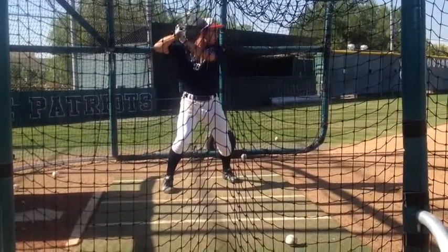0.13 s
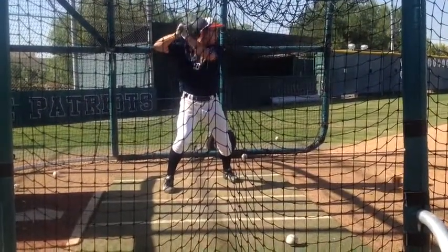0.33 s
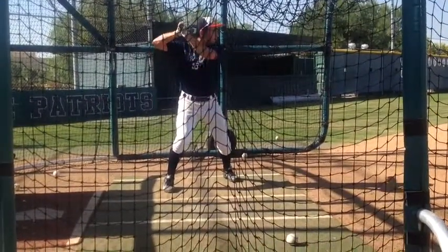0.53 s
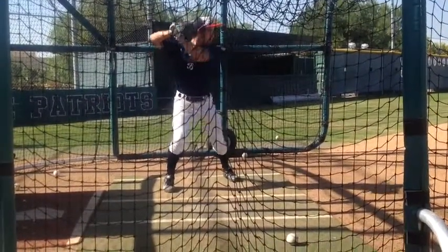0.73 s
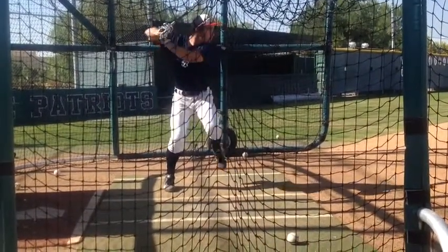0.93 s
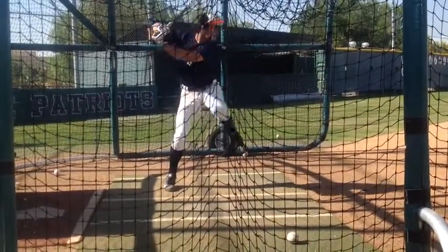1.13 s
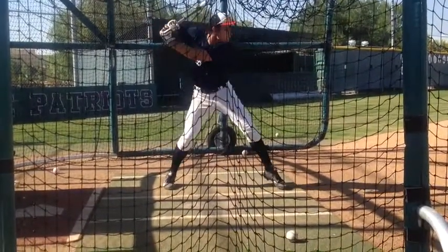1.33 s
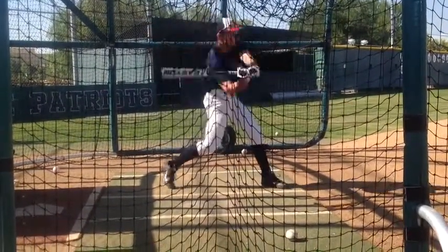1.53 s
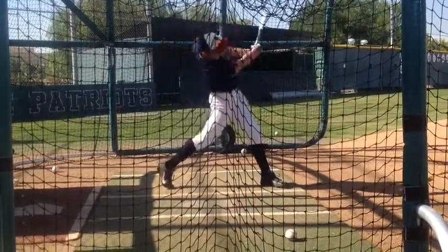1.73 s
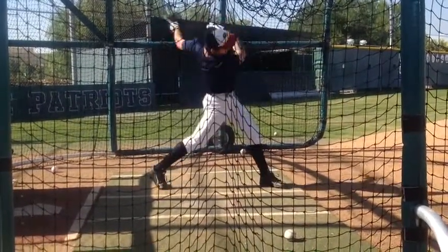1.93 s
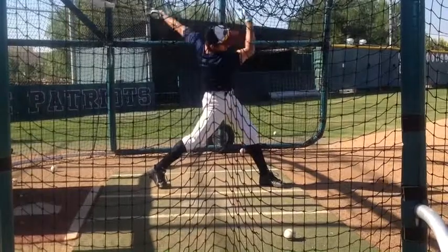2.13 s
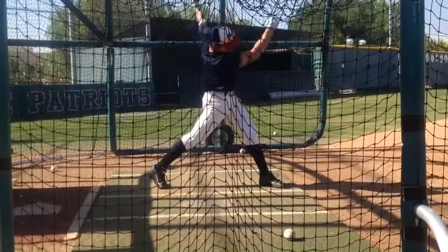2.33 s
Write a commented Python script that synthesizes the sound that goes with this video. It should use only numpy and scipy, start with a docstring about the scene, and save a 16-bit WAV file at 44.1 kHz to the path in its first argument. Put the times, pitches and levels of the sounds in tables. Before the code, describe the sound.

A bat hits a baseball with one sharp crack and brief ring over faint hum.

```python
"""A bat meets a pitched baseball in an outdoor batting cage: one hard crack, a hollow knock and a
brief ring of the barrel, loud enough to overload the input. Nearby walls slap the crack back and the
ballpark adds a short tail. The ball lands with a dull thud and shoes scuff the mat.
A motor, probably the pitching machine, hums under faint open-air noise."""
import sys
import numpy as np
from scipy import signal
from scipy.fft import rfft, irfft
from scipy.io import wavfile

SR = 44100
rng = np.random.default_rng(int(sys.argv[2]) if len(sys.argv) > 2 else 0)


def dump(signal):
    """Clip the signal to [-1, 1] and save it as 16-bit WAV at the path in sys.argv[1]."""
    limited = np.clip(np.atleast_2d(signal).T, -1, 1)
    pcm = np.round(limited * 32767).astype(np.int16)
    wavfile.write(sys.argv[1], SR, pcm)


N = 104958
HIT_S = 1.6488
# colour of grit under ball and shoes: f/Hz, relative level/dB
GRIT = [(50, -50), (200, -20), (1200, -9), (2400, -1.5), (3800, -14), (6000, -36), (15000, -35)]


def amp(db):
    """Decibels to gain."""
    return 10 ** (np.asarray(db) / 20)


def curve(points, hz, column=1):
    """A column of a spectrum table, interpolated over log frequency."""
    table = np.array(points, float)
    return np.interp(np.log(hz + 1), np.log(table[:, 0] + 1), table[:, column])


def add(mix, start_s, sound):
    """Lays a sound into the mix."""
    part = mix[round(start_s * SR):][:len(sound)]
    part += sound[:len(part)]


def pulse(colour, size=4096):
    """The sharpest causal click with a given spectrum (minimum phase)."""
    hz = abs(np.fft.fftfreq(size, 1 / SR))
    log_gain = np.log(amp(curve(colour, hz)))
    spectrum = np.exp(np.conj(signal.hilbert(log_gain)))
    return np.fft.ifft(spectrum).real[:size // 2]


def dull(x, cutoff_hz):
    """Rolls off the treble."""
    return signal.lfilter(*signal.butter(2, cutoff_hz, fs=SR), x)


def ring(modes):
    """Struck modes as decaying sines, one second long."""
    t = np.arange(SR) / SR
    return sum(amp(db - 60 * t / t60) * np.sin(2 * np.pi * hz * t) for hz, db, t60 in modes)


def attack(rise_s):
    """A one-second envelope that softens an onset."""
    return 1 - np.exp(-np.arange(SR) / SR / rise_s)


def burst(colour, t60):
    """A dying puff of coloured noise."""
    t = np.arange(SR // 2) / SR
    puff = rng.standard_normal(len(t)) * amp(-60 * t / t60)
    return signal.fftconvolve(puff / np.linalg.norm(puff), pulse(colour))


def drift(rate_hz):
    """A slow random wobble of unit RMS."""
    hz = np.fft.rfftfreq(N, 1 / SR)
    wobble = irfft(rfft(rng.standard_normal(N)) * np.exp(-(hz / rate_hz) ** 2) * (hz > 0), N)
    return wobble / wobble.std()


def reverb(bands, far_db=-100, far_t60=1):
    """Dense reflections, each band dying at its own speed, over a fainter long decay."""
    hz, t, noise = signal.stft(rng.choice([-1., 1.], SR), SR, nperseg=256)
    t60 = curve(bands, hz, column=2)[:, None]
    fade = amp(-60 * t / t60) + amp(far_db - 60 * t / far_t60)
    wash = signal.istft(noise * fade, SR, nperseg=256)[1][:SR]
    return signal.fftconvolve(wash / np.linalg.norm(wash), pulse(bands))[:SR]


def open_air():
    """A bed of distant outdoor noise that swells slightly."""
    # colour of the air: f/Hz, relative level/dB
    colour = [(18, -88), (30, -65), (75, -26.5), (92, -15), (114, -21.5), (130, -16), (177, -7), (208, -8),
              (237, -8.5), (307, -11.5), (410, -19), (591, -15), (1170, -20), (1290, -19), (1820, -23),
              (2240, -26), (15500, -46)]
    # its slow rise and fall: t/s, level/dB
    levels = [(0, -50), (.3, -49), (.6, -50), (.8, -50), (.95, -49), (1.2, -50.5), (1.6, -48), (2.0, -49),
              (2.38, -50)]
    hz = np.fft.rfftfreq(N, 1 / SR)
    bed = irfft(rfft(rng.standard_normal(N)) * amp(curve(colour, hz)), N)
    level_db = np.interp(np.arange(N) / SR, *np.transpose(levels)) + 0.4 * drift(13)
    return bed / bed.std() * amp(level_db)


def motor():
    """A wavering hum, mostly second harmonic, with thin whines on top."""
    # swells and dips of the second harmonic: t/s, RMS level/dB
    levels = [(0, -50.5), (.15, -48.5), (.45, -50.5), (.63, -51.5), (.78, -67), (.92, -68), (1.05, -58),
              (1.13, -49.5), (1.42, -46), (1.55, -50), (1.82, -50), (2.0, -57.5), (2.15, -56),
              (2.38, -49.5)]
    # motor whines: f/Hz, RMS level/dB
    whines = [(937, -72.5), (1147, -67), (1459, -72.5), (1669, -69.5), (1873, -67.5), (2390, -72.5)]
    hum_hz, fundamental_db, flutter = 104.9, -61.5, 0.19
    phase = 2 * np.pi * np.cumsum(hum_hz * (1 + 0.005 * drift(7.3))) / SR
    swell = amp(np.interp(np.arange(N) / SR, *np.transpose(levels)))
    hum = swell * (1 + flutter * drift(19)) * np.sin(2 * phase)
    hum += amp(fundamental_db) * np.sin(phase)
    for hz, db in whines:
        gain = amp(db + 2.9 * drift(7.1))
        pitch_hz = hz * (1 + 0.003 * drift(14.2))
        hum += gain * np.sin(2 * np.pi * np.cumsum(pitch_hz) / SR)
    return np.sqrt(2) * hum


def shoes():
    """The batter's feet turn and scuff the mat in the follow-through."""
    # scuffs: t/s, gain/dB, time to fall 30 dB/s
    scuffs = [(2.229, -11.5, 0.035), (2.268, -8, 0.25)]
    out = np.zeros(N)
    for start_s, db, length_s in scuffs:
        add(out, start_s, amp(db) * burst(GRIT, t60=2 * length_s))
    return out


def ball_landing():
    """The ball comes down with a dull thud and a little grit."""
    # ground contacts: t/s, thud gain/dB
    contacts = [(1.8532, -28), (1.8606, -41.5)]
    # modes of the thud: f/Hz, relative level/dB, t60/s
    modes = [(211, -5, 0.056), (350, 3, 0.044), (420, 3, 0.029), (880, -17, 0.017)]
    out = np.zeros(N)
    thud = ring(modes) * attack(rise_s=0.0029)
    for start_s, db in contacts:
        add(out, start_s, amp(db) * thud)
        add(out, start_s, amp(db + 27.5) * burst(GRIT, t60=0.029))
    return out


def ballpark():
    """The park answers the hit with a diffuse tail after a short pre-delay."""
    # park reverb: f/Hz, relative level/dB, t60/s
    bands = [(40, -48, .3), (150, -25, .3), (500, -20, 0.4), (1000, -8.5, .38), (1700, -0.5, 0.36),
             (2210, 1, 0.52), (2480, -3, 0.49), (2850, 1.5, 0.47), (3500, -5.5, 0.35), (5700, -12.5, 0.43),
             (6700, -18, 0.42), (15000, -28, 0.37)]
    tail_db, predelay_s = 16, 0.037
    out = np.zeros(N)
    tail = reverb(bands, far_db=-25, far_t60=1.74) * attack(rise_s=0.0027)
    add(out, HIT_S + predelay_s, amp(tail_db) * tail)
    return out


def wall_slaps():
    """Nearby walls throw back the crack and the barrel's ring, each with a puff of scatter."""
    # slaps: t/s, crack gain/dB, ring gain/dB, scatter gain/dB, scatter t60/s, cutoff/Hz
    slaps = [(1.6889, 13, -4, 17.5, 0.038, 5500), (1.7097, 10, -18, 14.5, 0.013, 8400),
             (1.7615, -7, -25, -1.5, .04, 3980), (1.771, -8, -31, 1.5, 0.029, 5000),
             (1.803, -11, -51, -2, 0.082, 6160), (1.834, -15, -44, -7, .05, 6130)]
    # colour of the walls' return: f/Hz, relative level/dB
    colour = [(40, -42), (180, -24), (390, -11.5), (620, -17), (1000, -10), (1500, 2), (2400, -2.5),
              (4100, -3.5), (5200, -10.5), (9500, -12), (16000, -12)]
    # ring that the barrel throws toward the walls: f/Hz, relative level/dB, t60/s
    modes = [(2232, -22, 0.31), (2771, -1, 0.04), (2720, -12, 0.061), (4450, -11, 0.03),
             (5600, -19.5, 0.054)]
    out = np.zeros(N)
    barrel = ring(modes) * attack(rise_s=0.001)
    for start_s, crack_db, ring_db, scatter_db, t60, cutoff_hz in slaps:
        add(out, start_s, amp(crack_db) * dull(pulse(colour), cutoff_hz))
        add(out, start_s, amp(ring_db) * barrel)
        add(out, start_s, amp(scatter_db) * dull(burst(colour, t60), cutoff_hz))
    return out


def bat_hit():
    """The contact cracks and knocks, sets the barrel ringing and scatters around the cage."""
    # colour of the contact pulse: f/Hz, relative level/dB
    colour = [(40, -43), (160, -10), (420, -21), (800, -0.5), (1250, 1), (2100, -17.5), (3000, 3),
              (5000, -16), (7800, -10), (10500, -14.5), (16000, -25.5)]
    # hollow knock of the contact: f/Hz, relative level/dB, t60/s
    knock_modes = [(585, -12, 0.069), (867, -1.5, 0.038), (1030, -12, 0.028), (1380, -3, 0.021)]
    # modes of the barrel: f/Hz, relative level/dB, t60/s
    barrel_modes = [(1000, -18, 0.088), (1370, -7, 0.089), (2250, -0.5, 0.25), (2320, -9, 0.33),
                    (2520, -6, 0.19), (2820, -6.5, 0.06), (2910, -13, 0.25), (4500, -21, .07),
                    (5605, -16, 0.35)]
    # early reflections off the ground and the cage frame: delay/s, gain/dB
    reflections = [(.0011, -15), (.003, -40), (.0054, -23), (.0086, -18), (.0125, -24), (0.0196, -15)]
    # scatter in the cage: f/Hz, relative level/dB, t60/s
    cage_bands = [(100, -33, 0.064), (390, -19.5, 0.11), (690, -3.5, 0.12), (1210, 0.5, 0.18),
                  (2240, -2.5, 0.21), (3000, -3.5, 0.16), (4340, -12.5, 0.17), (7000, -20, 0.22),
                  (15000, -24.5, 0.11)]
    crack_db, spray_db, knock_db, barrel_db, cage_db = 23.5, 17.5, -13, -20, 19.5
    out = np.zeros(N)
    crack = amp(crack_db) * pulse(colour)
    add(out, HIT_S, crack)
    add(out, HIT_S, amp(spray_db) * burst(colour, t60=0.0044))  # a spray of noise thickens the crack
    for delay_s, db in reflections:
        add(out, HIT_S + delay_s, amp(db) * dull(crack, cutoff_hz=4530))
    add(out, HIT_S, amp(knock_db) * ring(knock_modes))
    add(out, HIT_S, amp(barrel_db) * ring(barrel_modes))
    add(out, HIT_S, amp(cage_db) * reverb(cage_bands))
    return out


def scene():
    """The mono mix, heard from behind the cage."""
    return (bat_hit() + wall_slaps() + ballpark() + ball_landing() + shoes() + motor() + open_air())[None]


def record(dry):
    """The crack clips hard, then a steep low-pass trims the very top."""
    cutoff_hz = 15700
    clipped = np.clip(dry, -1, 1)
    lowpass = signal.firwin(255, cutoff_hz, window=("kaiser", 9), fs=SR)
    return signal.oaconvolve(clipped, lowpass[None], "same")


dry = scene()
out = record(dry)
dump(out)
```